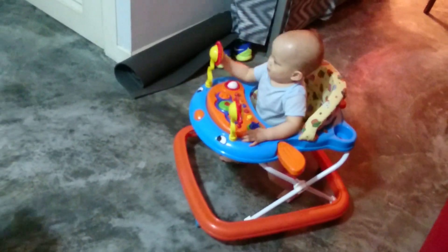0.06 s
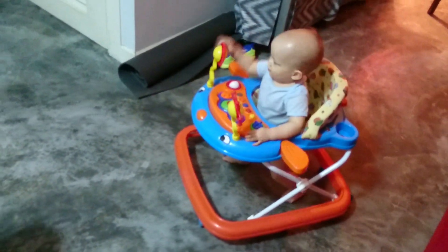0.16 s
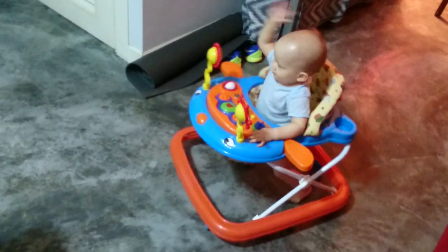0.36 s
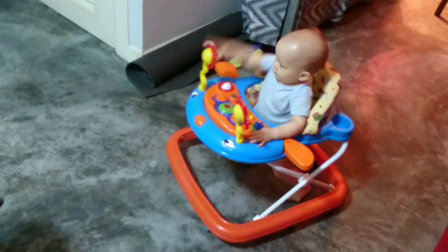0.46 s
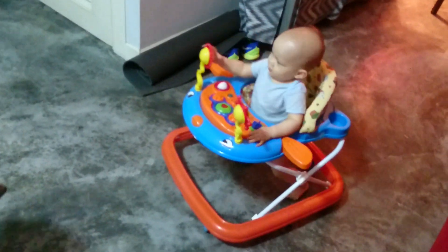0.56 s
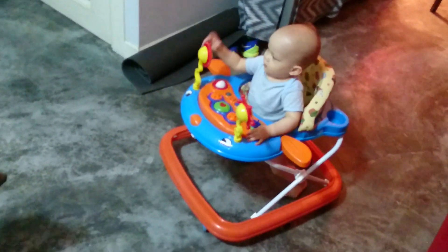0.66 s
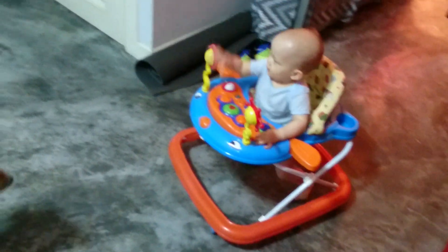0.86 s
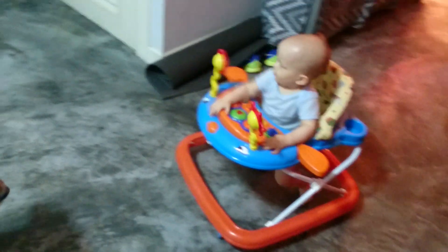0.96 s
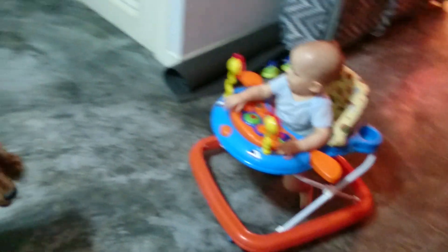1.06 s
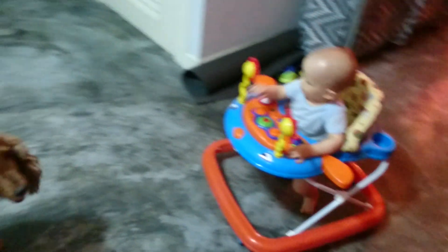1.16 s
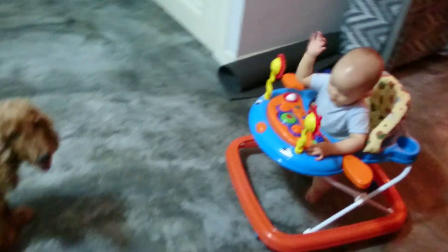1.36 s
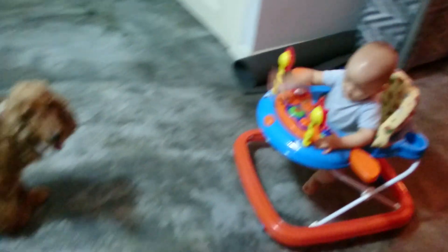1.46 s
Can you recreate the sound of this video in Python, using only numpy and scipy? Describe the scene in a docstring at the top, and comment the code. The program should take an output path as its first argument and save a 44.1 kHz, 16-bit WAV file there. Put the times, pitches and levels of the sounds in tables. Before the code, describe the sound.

A baby's hand slaps a plastic toy tray, making uneven, rattling knocks with a short echo.

```python
"""A baby in a plastic walker slaps at the toys on its tray, in a bare room with a hard floor.
Light knocks come first, then a hard slap at 0.5 s, a loud flurry around 1 s, a lull and one last tap.
Each knock is a short chatter of plastic on plastic that rings the hollow tray, the frame and the toys;
the room answers, over a steady hiss. The right microphone is much the louder."""
import sys
import numpy as np
from scipy import signal
from scipy.fft import rfft, irfft
from scipy.io import wavfile
from scipy.ndimage import uniform_filter1d

SR = 44100
rng = np.random.default_rng(int(sys.argv[2]) if len(sys.argv) > 2 else 0)


def wav_record(signal):
    """Record a signal, one row per channel, as 16-bit PCM in the file named by sys.argv[1]."""
    frames = np.transpose(np.atleast_2d(signal))
    bounded = np.clip(frames, -1, 1)
    # unit amplitude maps onto the largest positive 16-bit level
    quanta = np.round(bounded * 32767).astype(np.int16)
    wavfile.write(sys.argv[1], SR, quanta)


N = 66150
FREQS = np.fft.rfftfreq(8192, 1 / SR)
GRAZE_S = .0025  # light grazing contacts lead into the full blow

# Cue list of the slaps, each with its own tone and ring trims:
# start_s, level_db, body_db, snap_db, tray_db, frame_db, toys_db
SLAPS = [(.004, -16.5, 4, -8.5, -12, -3, -12), (.07, -22, 2, -10, -12, 3, 9.5),
         (0.152, -25, -6, -6, -12, 15, -16), (0.2133, -10.5, 2.5, -8.5, -14, 1, -16),
         (.234, -11, -11, -3, -20, 9.5, 7), (.257, -13.5, 11.5, -1, -0.5, 6, -1),
         (.296, -14.5, 5, -1.5, -0.5, 11, 8), (.333, -13.5, -5, -6, -19, -1, 7.5),
         (.354, -21, 11, -1, -11, -3, 2), (0.384, -16, 7, -3, -9, 3, 2.5), (.428, -26, 21, 6.5, -18, 0, -3),
         (0.4977, 0.5, -4, 3, 2, -13, -14), (.505, 0.5, 5, 0, -7.5, -11, -8),
         (.565, -4, -10, -9.5, -10.5, -6, -12), (.630, -13, -3, -5, -16, -4, 1.5),
         (0.7834, -15, -7, -3.5, -12, 1, -10), (0.8864, -6, 3.5, -3, -8, -12, -1.5),
         (.894, -7.5, -1, 0.5, -23, -18, -5), (0.905, -1, -6, -0.5, -9, -10, -14),
         (.941, -2.5, -5.5, 6.5, -13, 4.5, -11), (.951, -3, -4, -1, -7, 8, -9),
         (0.9607, -0.5, -5, -1, -4, -19, -4.5), (.972, -2.5, -17, -11, -9, 5, -9),
         (0.986, -12.5, 0, 11.5, -7, -11, -9), (1.0036, -0.5, 8, -10, -13, 6.5, 1.5),
         (1.009, -6, 15, -0.5, -12, -19, 2.5), (1.018, -7, 2, -15, -13, 1, -18),
         (1.057, -11.5, 1, -14, -3, 3, 7), (1.487, -19, 8, -4.5, -8, 1, 9.5)]


def walker(trim_db=-3):
    """Each slap fires a clack with its room echo, plus the longer ring of the parts it shakes."""
    out, t = np.zeros((2, N)), np.arange(SR // 2) / SR
    for start_s, level_db, body_db, snap_db, tray_db, frame_db, toys_db in SLAPS:
        force = amp(trim_db + level_db)
        add(out, start_s - GRAZE_S, force * clack(body_db, snap_db))
        add(out, start_s, force * ringing_parts(t, tray_db, frame_db, toys_db))
    return out


def clack(body_db, snap_db):
    """Plastic on plastic: a graze, the crack, quick rebounds, the shell's short ring, then the room."""
    graze_db, crack_db, chatter_db = -7.5, -11.5, -9  # against the shell's ring
    shell_t60_s, chatter_decay_s, rebounds_per_s = 0.058, 0.0027, 800
    room_body_share = 0.42  # the room gets only part of the body aimed at the microphone
    t = np.arange(SR * 3 // 4) / SR
    since_blow, struck = np.maximum(t - GRAZE_S, 0), t >= GRAZE_S
    graze, chatter, shell = rng.standard_normal((3, 2, len(t)))
    rebounds = rng.random(len(t)) < rebounds_per_s / SR
    graze *= t * ~struck
    chatter *= rebounds * struck * np.exp(-since_blow / chatter_decay_s)
    shell *= struck * fade(since_blow, shell_t60_s)
    direct = amp(graze_db) * unit(graze) + amp(chatter_db) * unit(chatter) + unit(shell)
    direct[:, np.argmax(struck)] += amp(crack_db)
    close = plastic_shell(unit(direct), body_db, snap_db)
    return close + plastic_shell(room(t), room_body_share * body_db, snap_db)


# Tone curve of the plastic shell: freq_hz, gain_db
SHELL_EQ = [(25, -44), (70, -20.5), (150, -20.5), (290, -13), (400, -6), (620, -1.5), (780, -4.5),
            (1000, -2), (1700, -2), (2700, -0.5), (3500, 1), (4400, -.5), (5300, -5), (6500, -13.5),
            (7800, -18.5), (9500, -21.5), (11200, -28.5), (13000, -18), (15600, -35.5)]


def plastic_shell(x, body_db, snap_db, body_hz=1190, width_octaves=0.66, snap_hz=5830):
    """The shell colours each hit, with a mid bell for body and a high shelf for snap."""
    tone_db = read(SHELL_EQ, FREQS)
    tone_db -= 10 * np.log10(np.mean(amp(tone_db) ** 2))  # average power gain of 1
    bell = np.exp(-.5 * (np.log2((FREQS + 1) / body_hz) / width_octaves) ** 2)
    shelf = 1 - 1 / (1 + (FREQS / snap_hz) ** 6)
    return colour(x, tone_db + body_db * bell + snap_db * shelf)


# Resonances of the hollow tray, the frame under it and the toys on it: pitch_hz, level_db, t60_s
TRAY_MODES = [(242, -13, .15), (367, 1, .44), (719, -6, .2), (896, -5, .18), (999, 1.5, .2),
              (1390, -3, .15), (1885, -6, .3), (3460, -2, .42), (4139, -1, .3)]
FRAME_MODES = [(367, -12, .35), (439, -3, .35), (470, 0, .4), (505, -4, .15), (533, -1, .15)]
TOY_MODES = [(894, -6, .22), (1022, -6, .15), (1092, 2, .33), (1135, -3, .18), (1191, -3, .25),
             (2348, -9, .35), (2644, -9, .35), (3257, -6, .35), (3380, -8, .3), (3921, -7, .35)]


def ringing_parts(t, tray_db, frame_db, toys_db, attack_s=0.0016):
    """Tray, frame and toys ring out as dying partials, in new phases wherever the blow lands."""
    out = np.zeros((2, len(t)))
    attack = 1 - np.exp(-t / attack_s)
    parts = (TRAY_MODES, tray_db - 5.5), (FRAME_MODES, frame_db - 15), (TOY_MODES, toys_db - 8)
    for modes, part_db in parts:
        pitch_hz, level_db, t60_s = np.transpose(modes)[:, :, None]
        phase = rng.random((2, len(modes), 1))
        partials = np.sin(2 * np.pi * (pitch_hz * t + phase)) * attack * fade(t, t60_s)
        out += (amp(part_db + level_db) * unit(partials)).sum(1)
    return out


# Reverb time of the bare room: freq_hz, t60_s
ROOM_DECAY = [(100, 1), (350, 0.8), (800, 0.74), (2000, 0.79), (4500, 0.66), (8000, 0.48), (14000, 0.39)]


def room(t, build_s=0.0061, echoes_per_s=600, early_t60_s=.12, early_db=-2, tail_db=0.5):
    """Sparse early echoes off floor and walls, then a diffuse tail that darkens as it dies."""
    onset = 1 - np.exp(-(np.maximum(t - GRAZE_S, 0) / build_s) ** 2)
    hz, frame_s, spectrum = signal.stft(rng.standard_normal((2, len(t))), SR, nperseg=256)
    spectrum *= fade(frame_s, read(ROOM_DECAY, hz)[:, None])
    tail = signal.istft(spectrum, SR, nperseg=256)[1][:, :len(t)]
    early = rng.standard_normal((2, len(t))) * fade(t, early_t60_s)
    early *= rng.random((2, len(t))) < echoes_per_s / SR
    return amp(tail_db) * unit(tail * onset) + amp(early_db) * unit(early * onset)


# Tone curve of the room hiss: freq_hz, gain_db
HISS_EQ = [(25, -22), (40, -33), (70, 2.5), (105, -9.5), (170, -3), (270, -2), (430, 6), (600, 0),
           (1050, 4.5), (1700, 0.5), (2700, 2), (3800, -1), (5100, -9), (6500, -17), (8000, -23),
           (10500, -33.5), (13000, -27), (16000, -31)]
# Its fader ride: time_s, level_db
HISS_FADER = [(0, -45.5), (.45, -45), (.85, -45.5), (1.45, -46)]


def hiss(drift_db=0.8):
    """A steady bed of room noise, with faint patches drifting through its spectrum."""
    hz, _, spectrum = signal.stft(rng.standard_normal((2, N)), SR, nperseg=2048)
    patches = uniform_filter1d(rng.standard_normal(spectrum.shape[1:]), size=16, axis=0)
    patches = uniform_filter1d(patches, size=4, axis=1)
    spectrum *= amp(read(HISS_EQ, hz)[:, None] + drift_db * patches / patches.std())
    noise = signal.istft(spectrum, SR, nperseg=2048)[1][:, :N]
    level_db = np.interp(np.arange(N) / SR, *np.transpose(HISS_FADER))
    return unit(noise) * np.sqrt(N) * amp(level_db)


def amp(db):
    """Decibels to gain."""
    return 10 ** (np.asarray(db) / 20)


def unit(x):
    """Scales to energy 1."""
    return x / np.sqrt(np.sum(x ** 2, -1, keepdims=True) + 1e-20)


def read(curve, hz):
    """Reads a curve on a log-frequency axis."""
    freq_hz, value = np.transpose(curve)
    return np.interp(np.log(hz + 1), np.log(freq_hz + 1), value)


def fade(t, t60_s):
    """Exponential decay, 60 dB down at t60_s."""
    return np.exp(-np.log(1000) * t / t60_s)


def add(mix, start_s, sound):
    """Drops a sound into the mix at its cue."""
    part = mix[:, max(round(start_s * SR), 0):][:, :sound.shape[1]]
    part += sound[:, :part.shape[1]]


def colour(x, gain_db):
    """Minimum-phase EQ with the given gains at FREQS."""
    log_gain = np.log(amp(np.r_[gain_db, gain_db[-2:0:-1]]))
    response = np.exp(np.conj(signal.hilbert(log_gain)))
    taps = np.fft.ifft(response).real[:len(gain_db) // 2]
    return signal.fftconvolve(x, taps[None], axes=1)[:, :x.shape[1]]


def scene():
    """The walker up front, the hiss behind it."""
    return walker() + hiss()


# Tone of the left microphone against the right: freq_hz, gain_db
LEFT_MIC_EQ = [(60, -3.5), (200, -5.5), (380, -9.5), (800, -8), (1150, -11), (1450, -12), (2300, -16.5),
               (4300, -19.5), (5400, -9.5), (6500, 5), (9000, 4.5), (10500, 2), (12500, -15), (16000, 8)]
# How closely left follows right: freq_hz, correlation
STEREO_IMAGE = [(60, -0.72), (250, -0.93), (500, -0.7), (1000, -0.2), (4000, 0.14), (16000, 0.027)]


def record(dry, lowpass_hz=16000):
    """Two unequal microphones, out of phase in the bass, with the very top cut off."""
    correlation = read(STEREO_IMAGE, np.fft.rfftfreq(2 * N, 1 / SR))
    other, right = rfft(dry, 2 * N)
    left = irfft(correlation * right + np.sqrt(1 - correlation ** 2) * other)[None, :N]
    pair = np.vstack([colour(left, read(LEFT_MIC_EQ, FREQS)), dry[1:]])
    lowpass = signal.firwin(511, lowpass_hz, window=("kaiser", 9), fs=SR)
    return signal.oaconvolve(pair, lowpass[None], "same")


dry = scene()
out = record(dry)
wav_record(out)
```